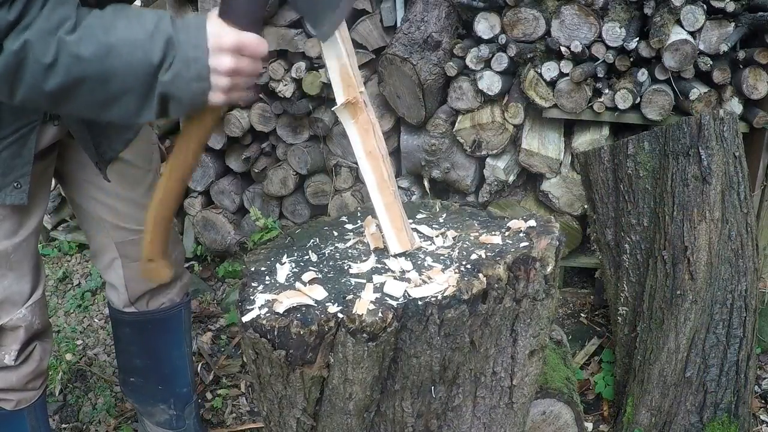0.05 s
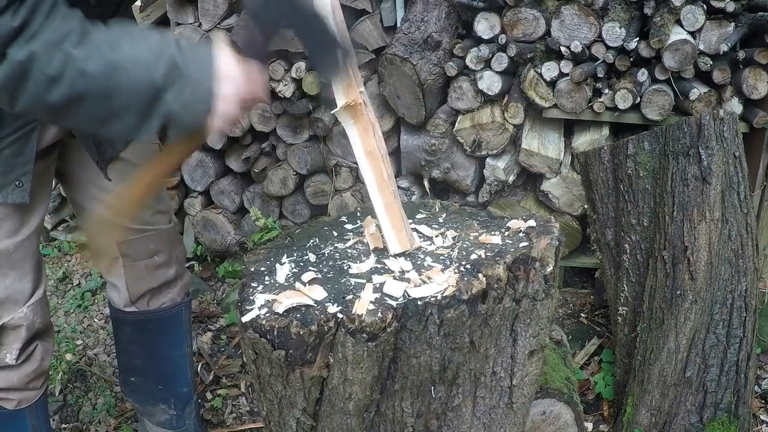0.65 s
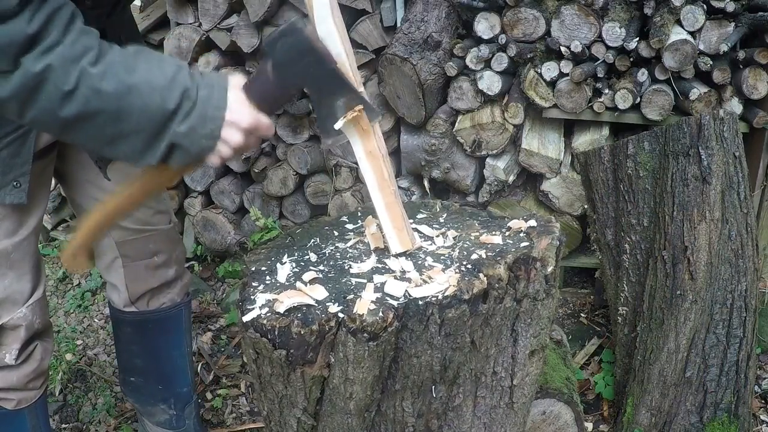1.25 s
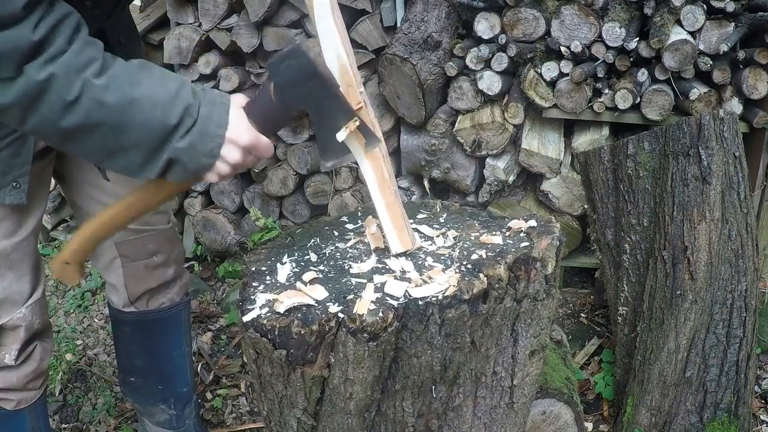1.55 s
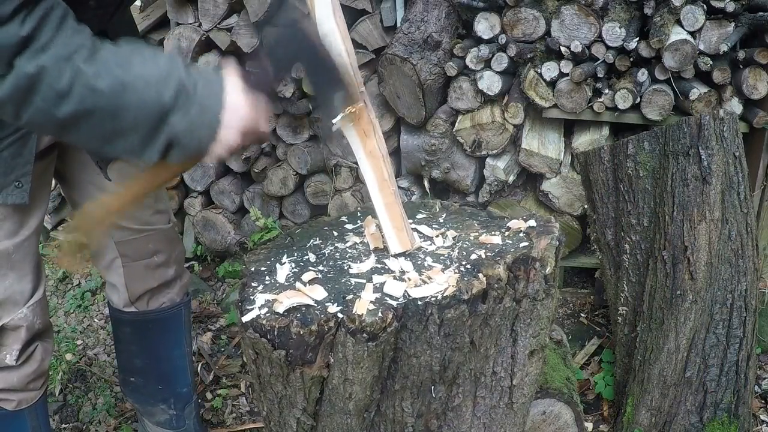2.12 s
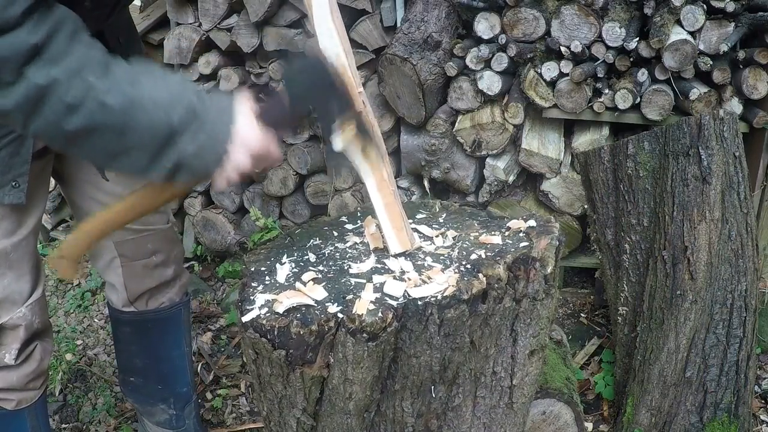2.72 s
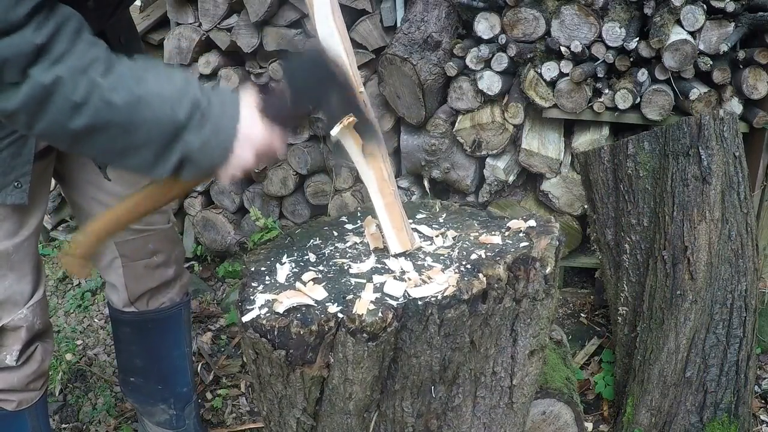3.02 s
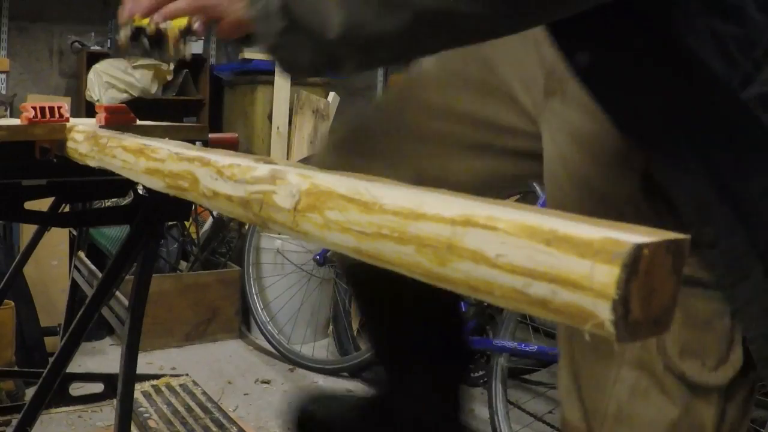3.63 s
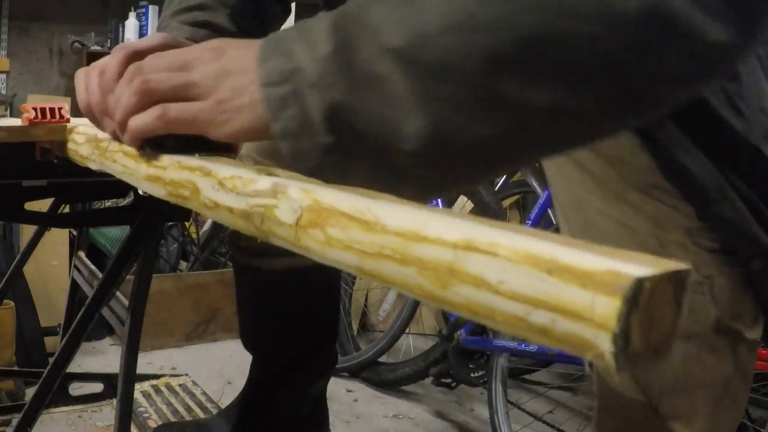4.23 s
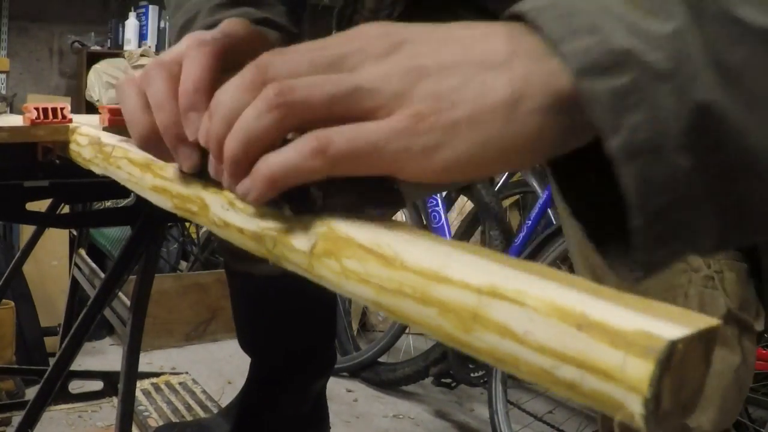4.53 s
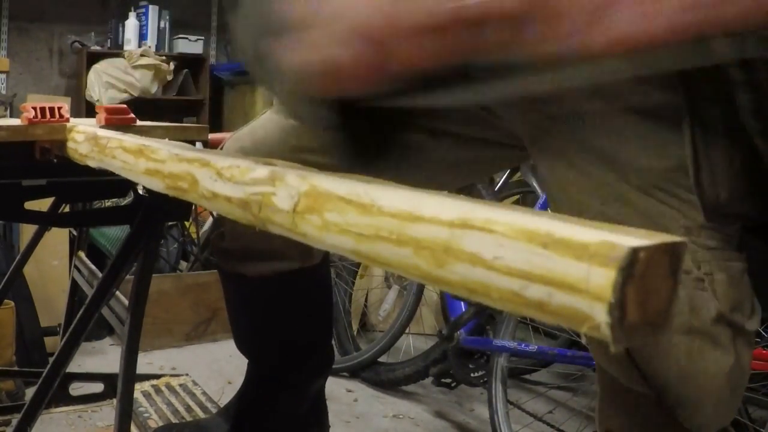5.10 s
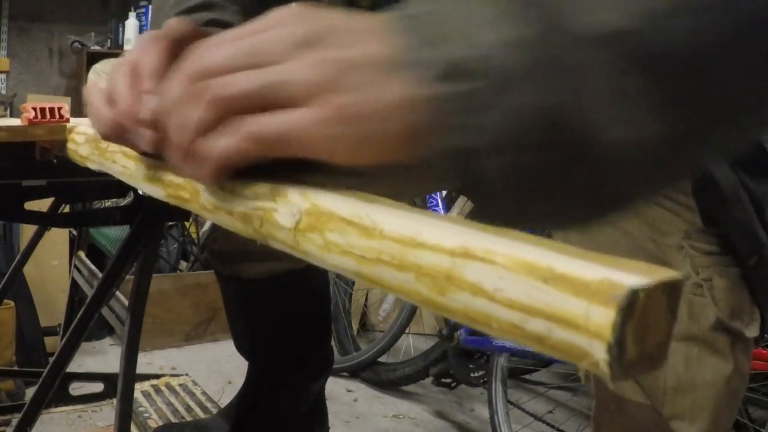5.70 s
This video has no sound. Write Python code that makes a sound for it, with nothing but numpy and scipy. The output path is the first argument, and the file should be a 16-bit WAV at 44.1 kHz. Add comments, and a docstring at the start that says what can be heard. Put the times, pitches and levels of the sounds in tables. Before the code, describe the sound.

Close, sharp hatchet blows bite into wood in an open yard, nearly four a second, with small crackles as chips split away. After twelve chops the place changes to a small, slightly reverberant workshop. Soft cloth rustling and a boot scuff lead to knocks of a metal plane on a pole, then a swelling, scraping shave with a crunchy catch. Another clack begins a second stroke. A quiet low rumble lies under both places.

```python
"""Hatchet and hand plane.

Outdoors, a hatchet chops twelve times into a stave on a block by a woodpile: each blow knocks, tears
fibres, and the blade rubs free. Then, in a small workshop, a jacket rustles, a boot steps up and an
iron plane is set on a clamped pole. Its sole rasps, the shaving hisses, the iron catches near the end,
and the plane is set down for a second stroke. Hush and low rumble lie under both places."""
import sys
import numpy as np
from scipy import signal
from scipy.fft import rfft, irfft
from scipy.io import wavfile

SR = 44100
rng = np.random.default_rng(int(sys.argv[2]) if len(sys.argv) > 2 else 0)


def bounce(signal):
    """Save signal as a 16-bit WAV file at the path given by the first command-line argument."""
    frames = np.transpose(np.atleast_2d(signal))
    limited = np.clip(frames, -1, 1)
    pcm = np.round(limited * 32767).astype(np.int16)
    wavfile.write(sys.argv[1], SR, pcm)


N = 258117
TIME_S = np.arange(N) / SR
AGE_S = TIME_S[:2 ** 14]   # since a blow

# diffuse stereo width (frequency [Hz], side re mid [dB])
DIFFUSE_WIDTH = [(60, -17), (250, -15), (800, -21.5), (2100, -24.5), (4200, -5), (8000, 0), (13000, 2.5)]
# background spectra (frequency [Hz], density [dB])
YARD_HUSH = [(70, -38.5), (130, -12.5), (550, -16.5), (1000, -14), (1400, -18), (2200, -27.5), (3500, -35),
             (11000, -47), (15500, -45.5)]
SHOP_HUSH = [(70, -34), (130, -10), (600, -14.5), (1030, -11), (1400, -18), (1800, -13), (2600, -76),
             (7500, -44), (15500, -53)]
RUMBLE_SPECTRUM = [(15, -6), (30, 3), (48, 3.5), (65, 1.5), (90, -8.5), (130, -13.5), (200, -18),
                   (400, -46.5)]
# reverberation (frequency [Hz], t60 [s])
YARD_T60 = [(150, 0.27), (400, 0.21), (1040, 0.17), (2800, 0.18), (7300, 0.14)]
SHOP_T60 = [(150, 0.81), (500, 0.31), (1500, 0.42), (4000, 0.3), (10000, 0.2)]

# blade skids along the grain (peak time [s], level [dB], rise [s], fall [s], fine fibres [dB])
BLADE_SKIDS = [(0.012, -27.5, 0.0049, 0.011, -49), (1.565, -18, 0.0041, 0.012, -20),
               (2.754, -28.5, 0.0012, .016, -34), (2.784, -23, 0.0064, 0.017, -25),
               (3.076, -27, 0.0048, 0.021, -47), (3.255, -37, .015, 0.0042, -53),
               (3.3607, -13.5, 0.0012, 0.0082, -22)]
# hatchet blows (time [s], knock [dB], treble shelf [dB], cut length [s], stop re knock [dB],
# tearing [dB], fine fibres [dB], rub [dB])
BLOWS = [(0.184, -3, -5.5, 0.0063, -25, -7, -34, -48), (0.454, -5.5, 7.5, .011, -8.5, -16.5, -13.5, -48),
         (0.731, -1, -1.5, .019, -26, -18.5, -14, -53), (1.012, -3, 5.5, 0.0029, -25, -34, -29, -56),
         (1.2881, -5.5, 9.5, 0.011, -23, -17, -32.5, -50), (1.564, -5, -7, .010, -17, -31, -7, -46),
         (1.880, -5.5, 5.5, 0.015, -28, -19.5, -33, -41), (2.184, -1.5, 2.5, 0.019, -14, -18.5, -15.5, -47),
         (2.4758, -3, 7, .015, -18, -17, -22, -46.5), (2.772, -5.5, -13, .013, -8, -19, -23, -46),
         (3.0753, -8, -18, 0.052, -13, -35, -53, -41.5), (3.361, -1, -7, 0.041, -9, -20.5, -39, -53)]
# torn wood, its finest fibres, dense part of the knock (frequency [Hz], density [dB])
TEAR_SPECTRUM = [(600, -25), (2000, -7), (3500, -8), (6200, -5), (8000, -7), (11000, -8), (15500, -17)]
FINE_SPECTRUM = [(4000, -32), (7500, 2.5), (11000, -4.5), (15500, -6.5)]
KNOCK_SPECTRUM = [(50, -26), (100, -11), (250, -10.5), (550, -10.5), (930, -2), (1500, -7.5), (2100, -15.5),
                  (3000, -11), (4300, -23.5), (5300, -30), (6400, -25), (10000, -34.5), (15500, -45.5)]
# splinters snapping (time [s], level [dB], pitch [Hz])
SPLINTER_SNAPS = [(0.809, -17.5, 7800), (1.1253, -34, 6600), (1.458, -35, 7100), (2.0273, -22, 8530),
                  (2.5188, -15.5, 6250), (2.588, -33.5, 7800), (2.7838, -6.5, 5940), (2.822, -13, 5530),
                  (3.287, -33, 4600), (3.363, -8, 14600)]
# one splinter (frequency / pitch [ratio], density [dB])
SPLINTER_SPECTRUM = [(.15, -36), (.55, -12), (1, 9), (1.5, -3.5), (3, -14)]
# stave, block and blade together (frequency [Hz], level [dB], t60 [s])
STAVE_MODES = [(105.1, -27, 0.4), (186.6, -33.5, 0.12), (348.6, -24, 0.19), (488, -10.5, 0.046),
               (584, -16.5, 0.15), (649.5, -16.5, 0.16), (835, -6, 0.061), (914, -5, 0.052),
               (1072, -4, 0.028), (1177, -8, 0.046), (1387, -26, 0.13), (1544, -6.5, 0.03),
               (2120, -17.5, .04), (2825, -7, 0.029), (3064, -5.5, 0.027), (3350, -17, 0.065),
               (3885, -12.5, 0.011), (6330, -18, 0.045)]

# jacket rustles (peak time [s], level [dB])
JACKET_RUSTLES = [(3.5, -41), (3.66, -44.5), (5.158, -46), (5.42, -43.5)]
# plane bumping the pole, sole clapping down (time [s], level [dB], hardness [dB])
POLE_BUMPS = [(3.705, -32.5, 4), (3.893, -18, -35), (3.970, -12, -6.5), (5.481, -11, 3.5)]
PLANE_LANDINGS = [(4.0447, -7, -5.5), (5.519, -8.5, 2)]
# clamped pole, iron plane (frequency [Hz], level [dB], t60 [s])
POLE_MODES = [(174.4, -28, 0.98), (270, -17, 0.091), (358, -19.5, 0.19), (479, -19.5, 0.72),
              (694, -10, 0.082), (853, -5, 0.13), (965, -4.5, 0.087), (1060, -26, 0.091),
              (1590, -10.5, 0.059), (2210, -17, 0.092)]
PLANE_MODES = [(441, -20, .2), (549, -21, .18), (967, -8, .19), (1170, -17, .2), (1387, -14, .25),
               (1600, -11, .22), (1940, -7, .18), (2260, -12, .19), (2655, -17, .2), (2950, -16, .16),
               (3253, -10, .22), (3520, -16, .21), (4255, -18, .25), (4620, -25, .22), (5180, -26, .2)]
# pushes; stroke one stalls and is forced on (time [s], length [s], effort [dB], slope [dB/s])
PLANE_PUSHES = [(4.161, 0.33, -12, 31.5), (4.679, 0.22, 4.5, -39.5), (5.605, 0.23, -11.5, 48)]
# reflection off the pole as the plane travels (time [s], lag [s])
REFLECTION_LAG = [(4.2, 0.00051), (4.55, 0.00081), (4.95, 0.001), (5.45, 0.00058), (5.65, 0.00041),
                  (5.85, 0.00061)]
# boot scuffs, iron catches, shaving squeaks (peak time [s], level [dB], rise [s], fall [s])
BOOT_SCUFFS = [(3.852, -22.5, 0.0014, 0.043), (3.905, -35.5, .008, 0.27)]
IRON_CATCHES = [(4.515, -27.5, 0.0043, 0.043), (4.731, -13.5, 0.0028, 0.011), (4.745, -17, 0.0024, 0.013),
                (4.7525, -6, 0.001, 0.0064), (4.762, -19.5, 0.036, 0.06), (4.972, -30, 0.0032, 0.018)]
SHAVING_SQUEAKS = [(4.83, -34, .03, 0.028), (4.974, -40, .007, .008)]
# workshop source spectra (frequency [Hz], density [dB])
CLOTH_SPECTRUM = [(150, -7), (500, 4), (1500, 3.5), (3500, -2.5), (6000, -3.5), (10000, -6), (15500, -15)]
BOOT_SPECTRUM = [(20, 8), (60, -1), (160, 4), (300, -6), (650, -3), (1200, -9.5), (2200, -7), (4500, -14),
                 (9000, -18.5), (15500, -31)]
CLACK_SPECTRUM = [(50, -41), (100, -10), (190, -9), (310, -17.5), (500, -3), (800, -10), (1000, 1.5),
                  (1250, -3.5), (1800, -1), (3200, -5), (4200, -11), (8000, -18), (15500, -37)]
RASP_SPECTRUM = [(60, -36), (120, 8.5), (190, -1.5), (300, -14), (450, -21), (750, -1), (1100, 8),
                 (1600, 1.5), (2600, 6), (6000, -21.5), (10000, -45)]
SHAVING_SPECTRUM = [(2000, -5.5), (3500, -1.5), (6000, -3.5), (8400, -5), (10000, -8), (13000, -9),
                    (15500, -16)]
CATCH_SPECTRUM = [(60, -12), (110, -7.5), (200, -2), (330, -7), (650, -5), (900, -11), (1400, -6.5),
                  (1900, -6.5), (4400, -14), (10000, -19), (15500, -56)]
SQUEAK_SPECTRUM = [(6500, -45), (8000, -9), (8450, -1), (8900, -18), (11000, -45)]

WOOD_DETUNE, IRON_DETUNE = 0.01, 0.001   # relative pitch scatter


def from_db(db):
    return np.exp(np.asarray(db) * (np.log(10) / 20))


def unit_rms(x):
    return x / np.sqrt(np.mean(x ** 2) + 1e-20)


def at_hz(table, hz):
    """Table lookup on a log-frequency axis."""
    known_hz, values = np.transpose(table)
    return np.interp(np.log(np.maximum(hz, 1)), np.log(known_hz), values)


def add(out, time_s, sound):
    start = round(time_s * SR)
    out[:, start:start + sound.shape[-1]] += sound[..., :N - start]


def decay(t60_s):
    return np.exp(-np.log(1000) * AGE_S / t60_s)


def noise(spectrum, size, grain=1, width_db=0):
    """Stereo noise, rms 1; grain weights the samples before colouring."""
    padded = 2 ** (size - 1).bit_length()
    hz = np.fft.rfftfreq(padded, 1 / SR)
    white = np.float32(rng.standard_normal((2, size)) * grain)
    mid, side = rfft(white, padded) * np.float32(from_db(at_hz(spectrum, hz)))
    side = side * np.float32(from_db(at_hz(DIFFUSE_WIDTH, hz) + width_db))
    return unit_rms(irfft([mid + side, mid - side], padded)[:, :size])


def flutter(rate_hz):
    """Random curve, rms 1."""
    knots = rng.standard_normal(N // 4)
    return unit_rms(np.interp(TIME_S * rate_hz, np.arange(len(knots)), knots))


def crackle(spectrum, grain_db, rate_hz, width_db=-10):
    """Noise in tiny clumps of uneven strength, as when fibres fail."""
    grain = from_db(grain_db * np.clip(flutter(rate_hz), -2, 2))
    return noise(spectrum, N, grain, width_db)


def swells(rows):
    """Gain of exponential rises and falls, summed in power."""
    power = np.zeros(N)
    for peak_s, db, rise_s, fall_s in rows:
        near = slice(*np.searchsorted(TIME_S, [peak_s - 10 * rise_s, peak_s + 10 * fall_s]))
        offset_s = TIME_S[near] - peak_s
        shape = np.exp(-np.maximum(-offset_s / rise_s, offset_s / fall_s))
        power[near] += (from_db(db) * shape) ** 2
    return np.sqrt(power)


def diffuse_tail(spectrum, t60_table, width_db=-3):
    """Scattered sound; each octave decays at its own rate."""
    bins = rfft(noise(spectrum, len(AGE_S), width_db=width_db))
    hz = np.fft.rfftfreq(len(AGE_S), 1 / SR)
    octave = np.log2(np.clip(hz, 125, 16000) / 125)
    bands = [irfft(bins * np.maximum(1 - abs(octave - k), 0)) for k in range(8)]
    return sum(band * decay(at_hz(t60_table, 125 * 2 ** k)) for k, band in enumerate(bands))


def with_reverb(x, t60_table, wet_db):
    """Direct sound plus scattered reflections."""
    response = diffuse_tail([(100, 0), (16000, 0)], t60_table)
    response = response / np.sqrt(np.sum(response ** 2) / 2)
    return x + from_db(wet_db) * signal.oaconvolve(x, response, axes=1)[:, :N]


def ringing(modes, detune, spread_db=1.8):
    """Struck body; the contact point shifts each mode's level and pitch slightly."""
    out = np.zeros(len(AGE_S))
    for k, (hz, db, t60_s) in enumerate(modes):
        gain = (-1) ** k * from_db(db + spread_db * rng.normal())
        pitch_hz = hz * (1 + detune * rng.normal())
        out += gain * decay(t60_s) * np.sin(2 * np.pi * pitch_hz * AGE_S)
    return out


def treble_shelf(x, gain_db, corner_hz):
    """Contact hardness: a slow, glancing touch leaves the high modes quiet."""
    w, g = 2 * np.pi * corner_hz, from_db(gain_db)
    b, a = signal.bilinear([g, np.sqrt(2 * g) * w, w * w], [1, np.sqrt(2) * w, w * w], SR)
    return signal.lfilter(b, a, x)


def from_right(x, lag_samples):
    """Source right of centre: all-pass delay on the left channel."""
    k = (1 - lag_samples) / (1 + lag_samples)
    return np.array([signal.lfilter([k, 1], [1, k], x[0] + 1e-18), x[1]])


def air(yard_db=-49, shop_db=-48, rumble_db=-41, waver_db=2.4, indoors_s=3.44, fade_s=0.021):
    """Distant wash outdoors, then steady hush indoors; wavering rumble under both."""
    indoors = np.clip((TIME_S - indoors_s) / fade_s, 0, 1)
    yard = (1 - indoors) * from_db(yard_db) * noise(YARD_HUSH, N)
    shop = indoors * from_db(shop_db) * noise(SHOP_HUSH, N)
    rumble = from_db(rumble_db + waver_db * flutter(rate_hz=6)) * noise(RUMBLE_SPECTRUM, N)
    return yard + shop + rumble


def tearing(cuts, rise_share=0.26, fall_share=0.25):
    """Gain of cuts that build from the blow until the chip gives way."""
    return sum(swells([(s + cut_s, db, rise_share * cut_s, fall_share * cut_s)]) * (TIME_S > s)
               for s, cut_s, db in cuts)


def fibres(rub_after_s=0.13, rub_rise_s=0.031, rub_fall_s=0.048, snap_db=-1, snap_t60_s=0.0089):
    """The blade skids, tears fibres and rubs back out; splinters snap."""
    blow_s, _, _, cut_s, _, tear_db, fine_db, rub_db = np.transpose(BLOWS)
    skids = swells(row[:4] for row in BLADE_SKIDS)
    fine_skids = swells((s, db, rise_s, fall_s) for s, _, rise_s, fall_s, db in BLADE_SKIDS)
    coarse = np.hypot(tearing(zip(blow_s, cut_s, tear_db)), skids)
    fine = np.hypot(tearing(zip(blow_s, cut_s, fine_db)), fine_skids)
    rubs = swells((s + rub_after_s, db, rub_rise_s, rub_fall_s) for s, db in zip(blow_s, rub_db))
    out = coarse * crackle(TEAR_SPECTRUM, grain_db=4, rate_hz=2000, width_db=-26)
    out += fine * crackle(FINE_SPECTRUM, grain_db=6, rate_hz=1400, width_db=-22.5)
    out += rubs * crackle(TEAR_SPECTRUM, grain_db=5.5, rate_hz=450, width_db=-22)
    for time_s, db, pitch_hz in SPLINTER_SNAPS:
        spectrum = [(pitch_hz * ratio, density_db) for ratio, density_db in SPLINTER_SPECTRUM]
        snap = noise(spectrum, len(AGE_S), width_db=-19) * decay(snap_t60_s)
        add(out, time_s, from_db(db + snap_db) * snap)
    return with_reverb(out, YARD_T60, wet_db=-9)


def hatchet(ring_db=-3.5, crack_db=-6.5, scatter_db=-14.5, scatter_rise_s=0.0032, stop_rise_s=0.0015):
    """Each blow cracks, rings the stave and scatters off the woodpile; the blade knocks again at rest."""
    out = np.zeros((2, N))
    for time_s, db, hardness_db, cut_s, stop_db, *_ in BLOWS:
        ring = from_db(ring_db) * ringing(STAVE_MODES, WOOD_DETUNE)
        crack = from_db(crack_db) * noise(KNOCK_SPECTRUM, len(AGE_S), width_db=-12) * decay(t60_s=0.036)
        scatter = from_db(scatter_db) * diffuse_tail(KNOCK_SPECTRUM, YARD_T60, width_db=-5.5)
        scatter *= 1 - np.exp(-AGE_S / scatter_rise_s)
        knock = from_db(db) * treble_shelf(ring + crack + scatter, hardness_db, corner_hz=1480)
        stop = from_db(stop_db) * knock * (1 - np.exp(-AGE_S / stop_rise_s))   # wedging blunts the onset
        add(out, time_s, knock)
        add(out, time_s + cut_s, stop)
    return from_right(out, lag_samples=0.22)


def jacket(rise_s=0.13, fall_s=0.15):
    """Cloth rustles as the arms swing the plane into place."""
    gain = swells((s, db, rise_s, fall_s) for s, db in JACKET_RUSTLES)
    return gain * crackle(CLOTH_SPECTRUM, grain_db=1.4, rate_hz=320, width_db=-6)


def pole_bumps(ring_db=-1, room_db=-8, contact_s=0.0007):
    """Lining up the plane rings the wooden pole with a soft onset."""
    out = np.zeros((2, N))
    for time_s, db, hardness_db in POLE_BUMPS:
        ring = from_db(ring_db) * ringing(POLE_MODES, WOOD_DETUNE)
        room = from_db(room_db) * diffuse_tail(CLACK_SPECTRUM, SHOP_T60)
        room = treble_shelf(room, gain_db=-10.5, corner_hz=1020)
        bump = treble_shelf(ring + room, hardness_db, corner_hz=790)
        add(out, time_s, from_db(db) * bump * (1 - np.exp(-AGE_S / contact_s)))
    return out


def boot():
    """A heel thuds and drags over grit."""
    return swells(BOOT_SCUFFS) * crackle(BOOT_SPECTRUM, grain_db=1.5, rate_hz=480)


def plane_knocks(ring_db=1.5, room_db=-6, clack_db=-1.5):
    """The iron sole claps down, rings and fills the workshop."""
    out = np.zeros((2, N))
    for time_s, db, hardness_db in PLANE_LANDINGS:
        ring = from_db(ring_db) * ringing(PLANE_MODES, IRON_DETUNE)
        ring = treble_shelf(ring, hardness_db / 2, corner_hz=2750)   # hard landings wake the high modes
        clack = from_db(clack_db) * noise(CLACK_SPECTRUM, len(AGE_S), width_db=-12) * decay(t60_s=0.066)
        room = from_db(room_db) * diffuse_tail(CLACK_SPECTRUM, SHOP_T60, width_db=-5.5)
        add(out, time_s, from_db(db) * treble_shelf(ring + clack + room, hardness_db, corner_hz=2070))
    return from_right(out, lag_samples=0.25)


def effort(attack_s=0.022, release_s=0.073):
    """Gain of the pushes: each sets in, gains or loses speed, and runs out."""
    gain = np.zeros(N)
    for start_s, length_s, db, db_per_s in PLANE_PUSHES:
        age_s = np.maximum(TIME_S - start_s, 0)
        attack = 1 - np.exp(-age_s / attack_s)
        release = np.exp(-np.maximum(age_s - length_s, 0) / release_s)
        gain += attack * from_db(db + db_per_s * np.minimum(age_s, length_s)) * release
    return gain


def pole_reflection(x, reflection_db=-19):
    """A reflection of changing path length sweeps ripples through the spectrum."""
    lag_s = np.interp(TIME_S, *np.transpose(REFLECTION_LAG))
    reflection = np.array([np.interp(TIME_S - lag_s, TIME_S, channel) for channel in x])
    gain = from_db(reflection_db)
    return (x + gain * reflection) / np.sqrt(1 + gain ** 2)


def planing(rasp_db=-35, hiss_db=-30, catch_db=-1, body_db=-7, rasp_exponent=0.71):
    """The sole rasps and rings the plane; the shaving hisses, squeaks and breaks as the iron catches."""
    push = effort()
    ripple_db = 1.37 * flutter(rate_hz=70)   # cut depth varies with the grain
    friction = crackle(RASP_SPECTRUM, grain_db=0, rate_hz=510, width_db=-66)
    body = unit_rms(signal.oaconvolve(friction[0], ringing(PLANE_MODES, IRON_DETUNE))[:N])
    rasp = push ** rasp_exponent * from_db(rasp_db + ripple_db) * (friction + from_db(body_db) * body)
    hiss = push * from_db(hiss_db + ripple_db) * crackle(SHAVING_SPECTRUM, grain_db=-2, rate_hz=1600)
    breaking = crackle(CATCH_SPECTRUM, grain_db=-0.5, rate_hz=1200, width_db=-31)
    catch = from_db(catch_db) * swells(IRON_CATCHES) * breaking
    squeak = swells(SHAVING_SQUEAKS) * noise(SQUEAK_SPECTRUM, N, width_db=-10)
    return with_reverb(pole_reflection(rasp + hiss) + catch + squeak, SHOP_T60, wet_db=-11.5)


def scene():
    """Chopping outdoors, then planing indoors."""
    return air() + fibres() + hatchet() + jacket() + pole_bumps() + boot() + plane_knocks() + planing()


def record(dry, cutoff_hz=15500):
    """Soft clip, then steep low-pass."""
    rounded = dry / (1 + dry ** 6) ** (1 / 6)
    return signal.sosfilt(signal.ellip(10, 0.2, 80, cutoff_hz, fs=SR, output="sos"), rounded)


dry = scene()
out = record(dry)
bounce(out)
```